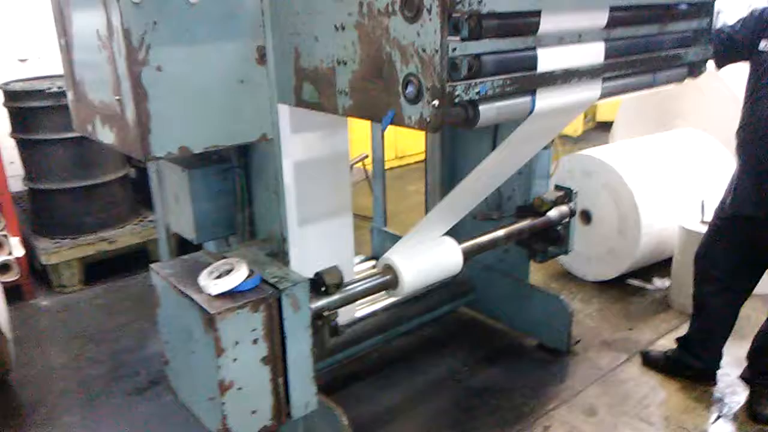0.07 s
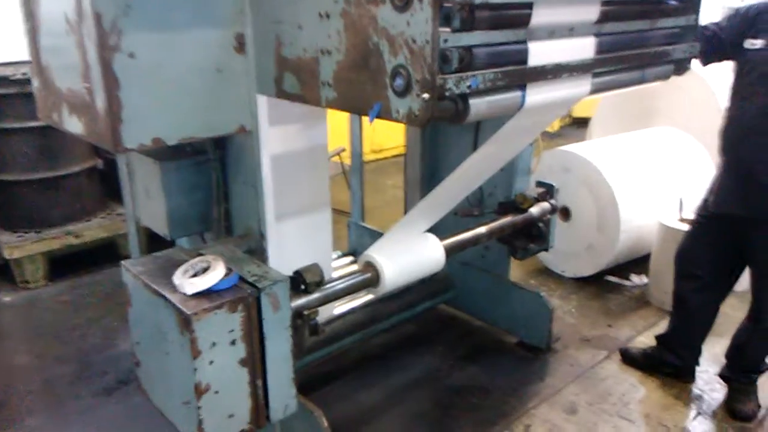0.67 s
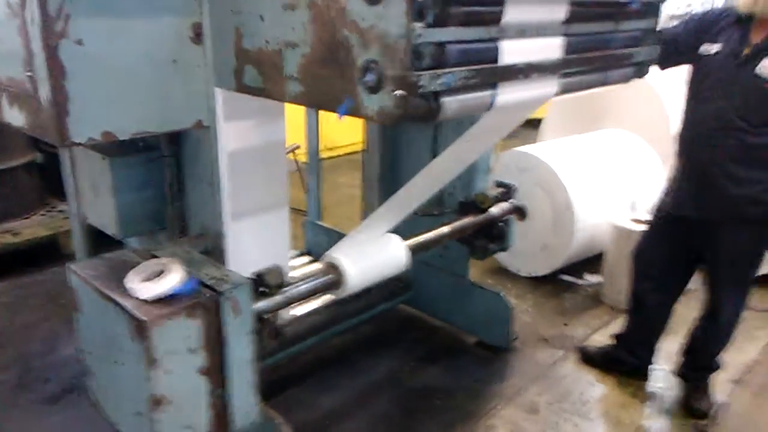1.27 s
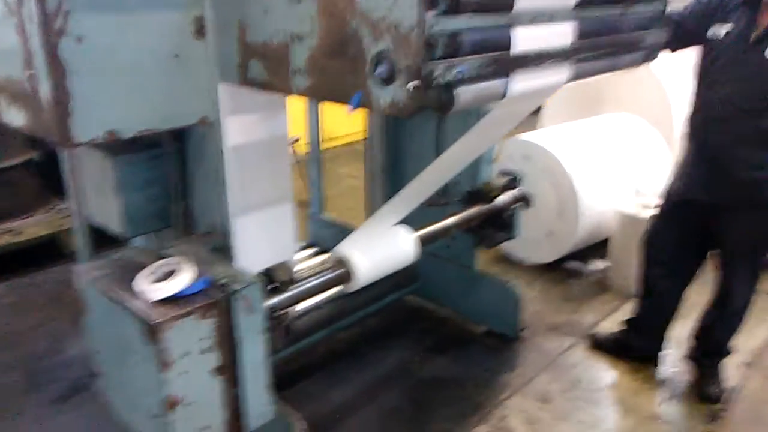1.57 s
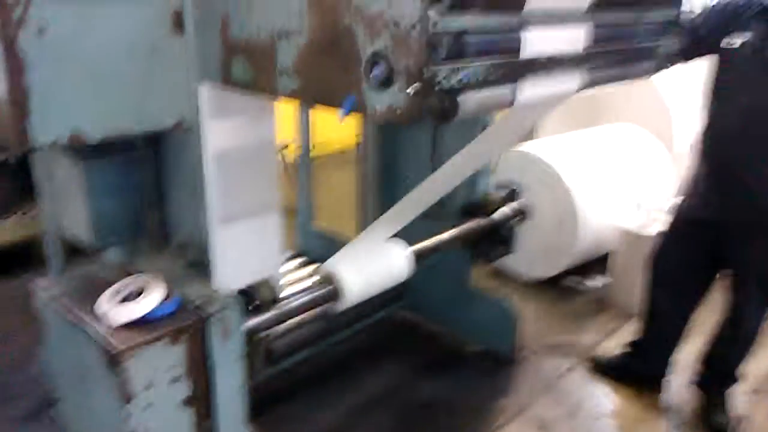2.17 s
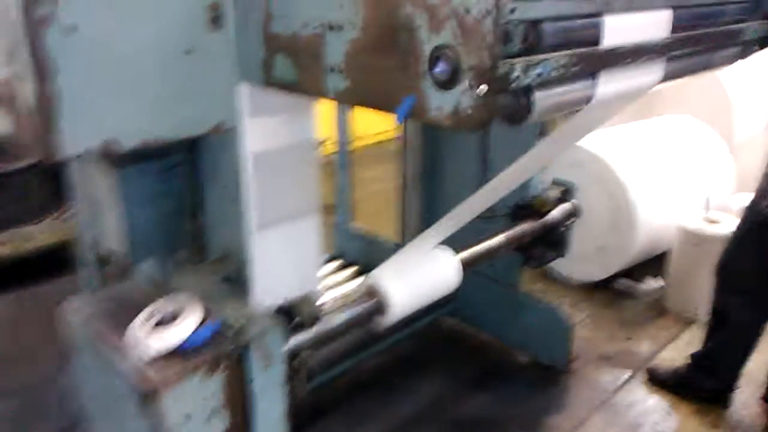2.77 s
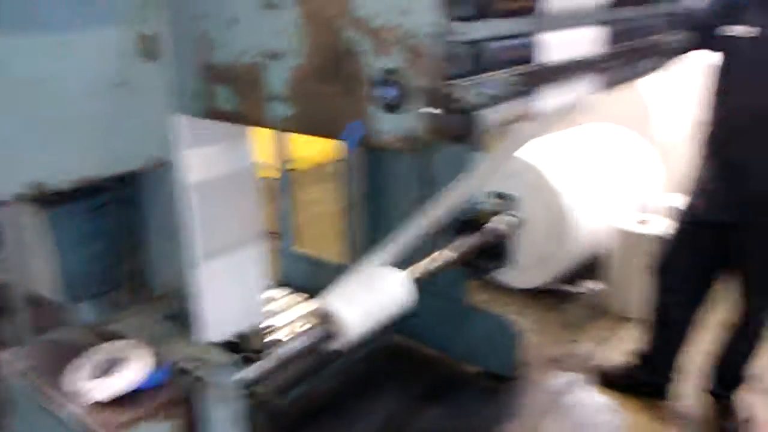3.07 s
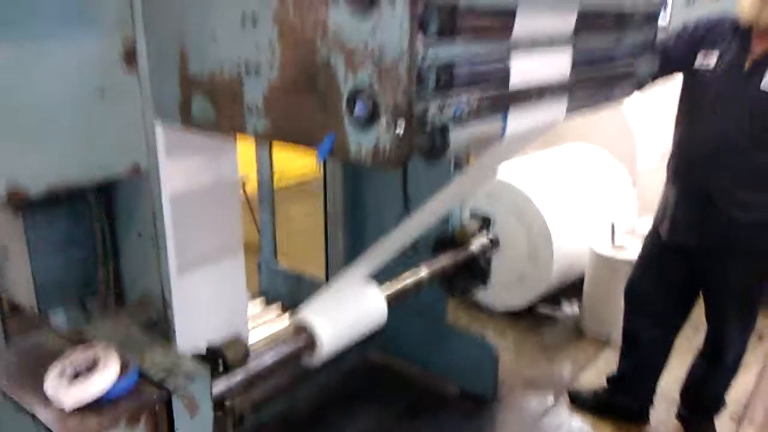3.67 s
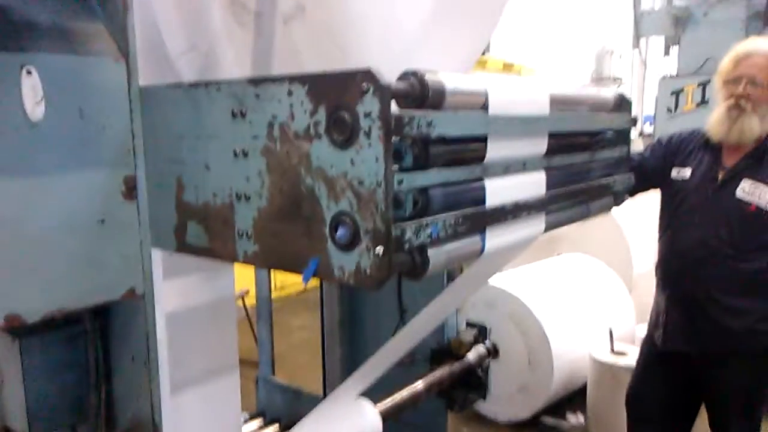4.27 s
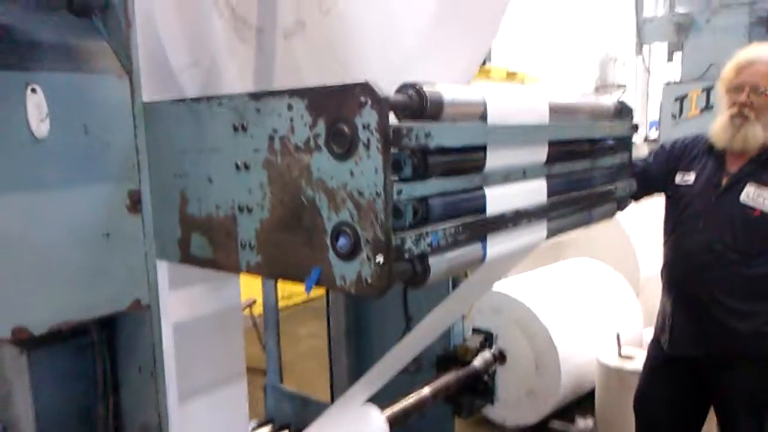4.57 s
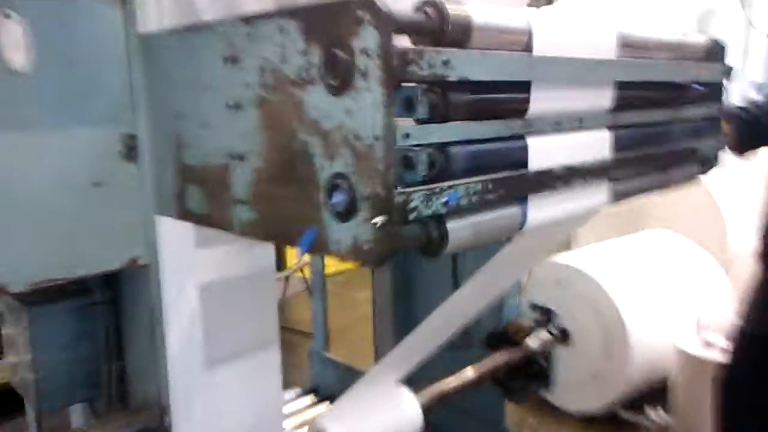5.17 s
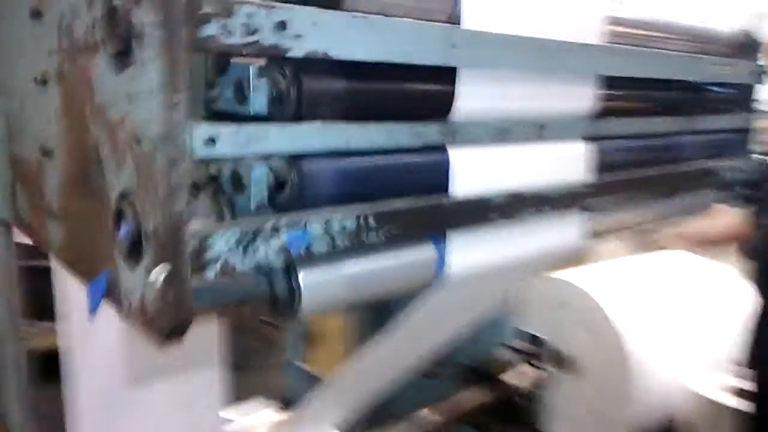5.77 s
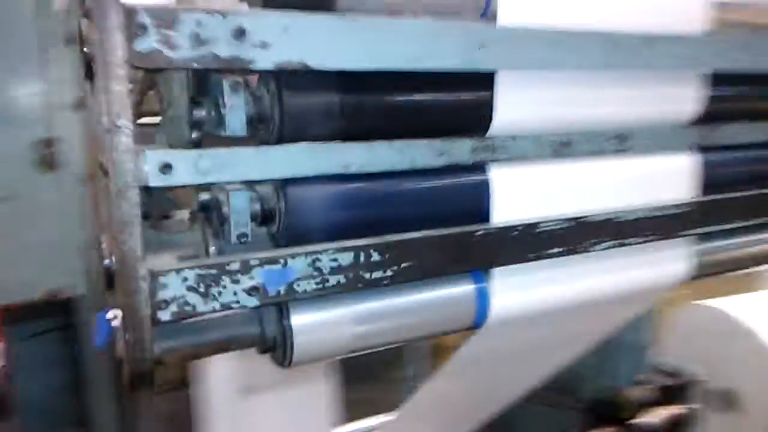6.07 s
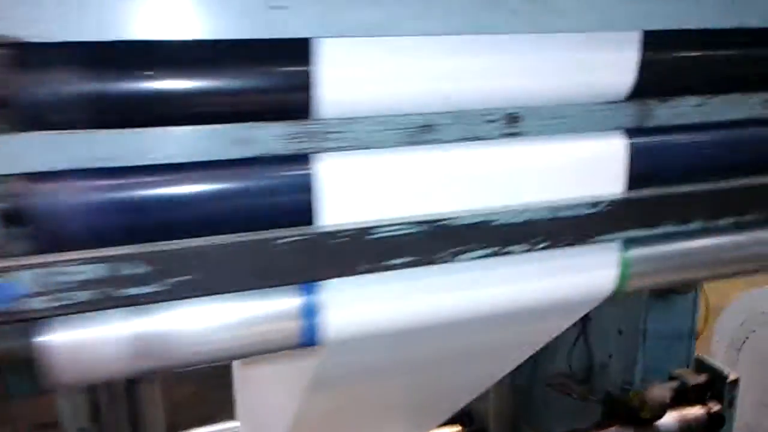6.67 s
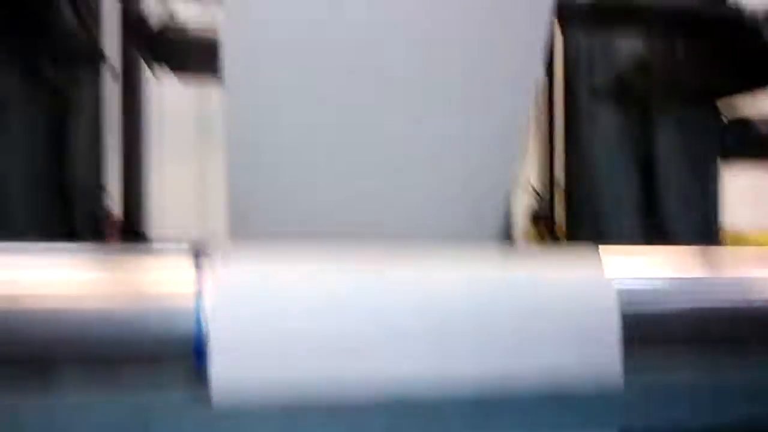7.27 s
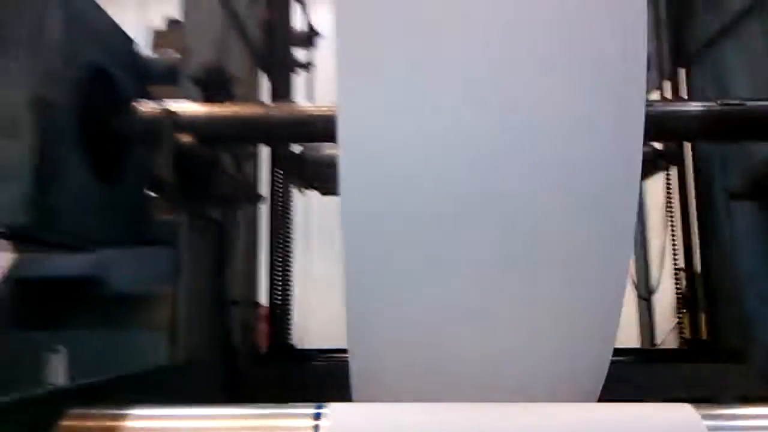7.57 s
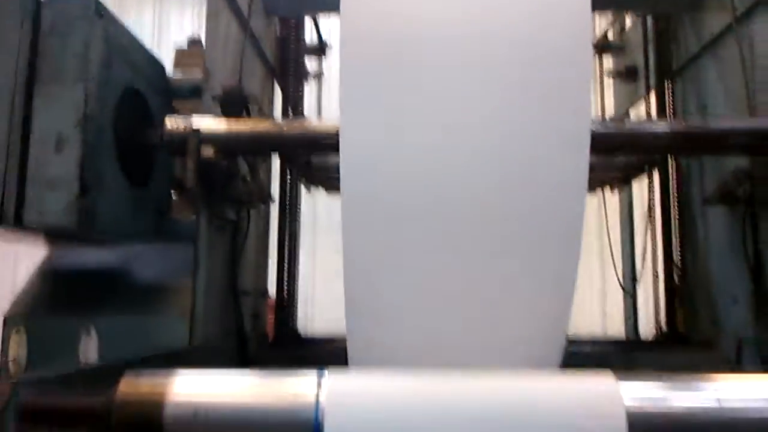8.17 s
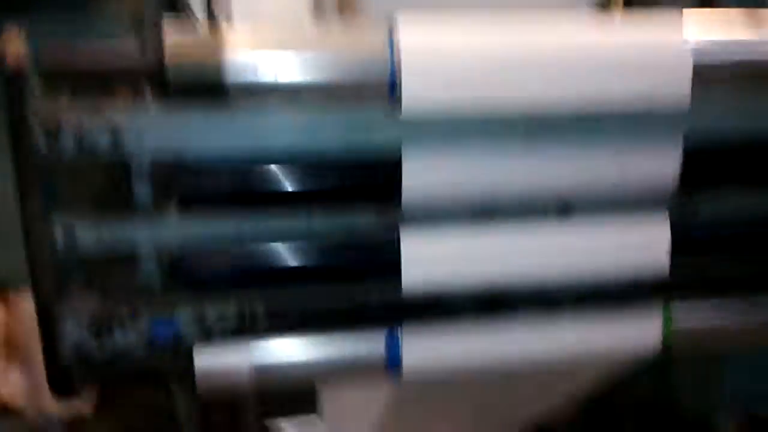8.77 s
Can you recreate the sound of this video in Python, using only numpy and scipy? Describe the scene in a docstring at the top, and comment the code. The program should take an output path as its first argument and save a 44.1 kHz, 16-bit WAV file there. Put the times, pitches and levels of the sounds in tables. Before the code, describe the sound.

A loud, thumping machine roar fades in: a printing press pulling paper through its rollers in a print shop. It falls back suddenly but keeps the same quick rhythm, over humming drives and a thin, high paper hiss. The microphone moves from the aisle toward the rollers, so the low rumble and thumps build again, with faint metallic squeaks and a gear whine near the end.

```python
"""A loud thumping roar fades in and drops at two seconds: a web printing press in a hard-walled shop.
It runs at steady speed; each cylinder turn repeats the same blows in the iron frame and the same gear
rumble. Drives hum, rollers and bearings roar, and the paper web sizzles as it peels off the rollers.
Rumble and roar grow again as the two-port mic is carried from the aisle up to the rollers."""
import sys
import numpy as np
from scipy import signal
from scipy.fft import rfft, irfft
from scipy.io import wavfile

SR = 44100
rng = np.random.default_rng(int(sys.argv[2]) if len(sys.argv) > 2 else 0)


def materialize(psi):
    """Save the field psi as 16-bit PCM at rate SR to the path in sys.argv[1].

    A 1-D psi becomes a single channel; in a 2-D psi each row is a channel.
    """
    bounded = np.clip(np.atleast_2d(psi).T, -1, 1)
    quanta = np.round(bounded * 32767).astype(np.int16)
    wavfile.write(sys.argv[1], SR, quanta)


N = 397782
TIME_S, FREQ_HZ = np.arange(N) / SR, np.arange(N // 2 + 1) * SR / N
TURN_HZ = 6.797

# low wash of the shop: freq_hz, density_db
WASH_SPECTRUM = [(30, -25), (42, -25), (56, -11), (75, -8), (95, -7), (120, -1.5), (160, -4.5), (200, -4.5),
                 (255, -2.5), (310, -2), (365, -4), (430, -6.5), (520, -21.5), (800, -29)]
# weak steady tones, relative to the rumble: pitch_hz, level_db
HUMS = [(55.6, -26.5), (333.2, -21), (365.8, -15.5), (693.5, -25.5), (1195, -27.5), (1577, -29)]
# where the motor hum stands out: time_s, level_db, falloff_db_per_s
MOTOR_SPOTS = [(1.45, -28.5, 7), (8.95, -22, 20)]
# where the gear whine stands out: time_s, level_db, falloff_db_per_s
WHINE_SPOTS = [(1.0, -31, 9.8), (4.2, -30, 14.6), (6.85, -31, 25), (8.0, -23, 14), (8.65, -23, 9)]
# where the whine's octave stands out: time_s, level_db, falloff_db_per_s
OCTAVE_SPOTS = [(1.7, -37, 4.7), (3.2, -35, 5.9), (8.65, -32, 22)]
# brief metallic rings: peak_s, pitch_hz, half_length_s, level_db
RINGS = [(4.146, 345, .03, -21), (5.028, 610, .012, -24), (5.052, 555, 0.019, -22.5), (5.1, 690, .018, -26),
         (5.24, 1170, 0.022, -31), (5.76, 1291, .02, -28), (6.727, 1580, .04, -28),
         (7.033, 2580, .028, -34), (7.647, 1205, 0.022, -27), (8.28, 1722, .02, -31),
         (8.38, 2957, .02, -33), (8.537, 1040, .018, -24), (8.73, 1185, 0.031, -26),
         (8.824, 2756, .018, -35), (8.89, 1590, .015, -30), (8.892, 2038, .018, -32)]
# paper peeling off the rollers: freq_hz, density_db
SIZZLE_SPECTRUM = [(4500, -46), (5700, -10.5), (6400, -2), (7100, -4), (7700, 0.5), (8100, -1), (8500, 0.5),
                   (9400, -1.5), (10100, -1.5), (11200, -4), (12500, -8.5), (13500, -11), (14300, -16)]
# narrow resonances, relative to the sizzle: centre_hz, width_hz, level_db
SIZZLE_RESONANCES = [(7612, 45, -20), (8405, 65, -18)]
# sizzle balance between the ports: freq_hz, left_minus_right_db
SIZZLE_BALANCE = [(5700, -1), (6500, 2.5), (7600, -1), (8400, -6), (10000, -12.5), (12500, -13),
                  (14000, -8)]
# shading of the sizzle by the roller stand: time_s, gain_db, leftward_db
SIZZLE_SHADING = [(2.2, -24, -6.5), (2.27, -24, -6.5), (4.98, -24, -6.5), (5.21, -29, -4.5),
                  (5.55, -29, -1), (6.02, -28, -3.5), (6.21, -32.5, -3.5), (7.09, -27.5, -6.5),
                  (7.44, -30.5, -2.5), (7.88, -31, -6), (8.22, -33.5, -6), (8.6, -29.5, -6),
                  (9.0, -30, -6.5)]
# taut web, drumming low and scraping high: freq_hz, density_db
RASP_SPECTRUM = [(340, -14), (430, 7.5), (540, 9.5), (660, -7), (1000, 7), (1400, -16), (2200, -5),
                 (2700, -2), (3300, -5), (3900, -16)]
# where the rasp stands out, relative to the roar: time_s, level_db, falloff_db_per_s
RASP_SPOTS = [(8.62, -1, 7)]
# roller roar: freq_hz, density_db
ROLLER_SPECTRUM = [(280, -33), (450, -6), (580, -0.5), (720, 0.5), (900, -3.5), (1080, -4), (1250, -2.5),
                   (1500, -5), (1800, -6.5), (2250, -11.5), (2800, -11), (3300, -16), (4000, -18.5),
                   (5500, -19.5)]
# bearing rush: freq_hz, density_db
BEARING_SPECTRUM = [(1800, 4), (2500, 0), (3400, 2), (4000, -1), (4600, -1.5), (5000, 1.5), (5500, -2.5),
                    (6400, -1), (8000, -10.5), (14000, -19)]
# echoes off nearby steel panels: delay_s, gain_db
PANEL_ECHOES = [(.0023, -12.5), (.0037, -12), (.0058, -17), (.0083, -15.5)]
# gear train rumble: freq_hz, density_db
GEAR_SPECTRUM = [(70, -18), (115, -1), (140, -1), (170, -4.5), (215, -1), (255, -1.5), (300, -2.5),
                 (360, -2), (470, -10.5), (700, -6.5), (1300, -22)]
# blows of one turn: phase_turns, pitch_hz, rise_ms, aisle_db, beside_db, front_db, rollers_db
BLOWS = [(.078, 169, 7.6, -18, -12, -13, -11), (.146, 248, 23.5, -19, -17, -21, -20),
         (.248, 189, 15.4, -19, -16, -19, -19), (.366, 326, 24, -26, -22, -27, -26),
         (.385, 386, 3, -15, -10, -13, -13), (.43, 139, 9.3, -22, -20, -21, -18),
         (.59, 120, 18.5, -20.5, -17.5, -15, -15), (.705, 218, 3.4, -12, -10, -15, -12),
         (.793, 243, 24, -24, -21, -18, -19.5), (.901, 148, 6.9, -18, -13, -10, -12),
         (.921, 157, 22.8, -20, -14, -16, -25), (.939, 184, 4.6, -19, -14, -9, -26)]
# mic path: time_s, place (0 aisle, 1 beside the stand, 2 in front of it, 3 at the rollers)
MIC_PATH = [(3.85, 0), (4.15, 1), (5.2, 1), (5.55, 2), (6.3, 2), (6.9, 3)]
# gains along the mic path: time_s, rumble_db, roar_db
APPROACH = [(2.4, -20, -25.5), (2.51, -20, -26), (3.59, -21, -25.5), (4.03, -18.5, -26),
            (4.13, -14.5, -22.5), (4.49, -16, -23), (5.58, -18, -23), (8.04, -17, -24),
            (8.67, -12.5, -22.5), (9.0, -12, -21.5)]


def undb(db):
    """Decibels to gain."""
    return 10 ** (np.asarray(db) / 20)


def ramp(from_s, to_s):
    """Linear rise from 0 to 1."""
    return np.clip((TIME_S - from_s) / (to_s - from_s), 0, 1)


def curves(table):
    """Table columns, interpolated over time."""
    times_s, *columns = np.transpose(table)
    return [np.interp(TIME_S, times_s, column) for column in columns]


def passing_db(spots, floor_db):
    """Level that peaks as the mic passes each spot."""
    peaks_db = [db - db_per_s * np.abs(TIME_S - at_s) for at_s, db, db_per_s in spots]
    return np.maximum(np.max(peaks_db, axis=0), floor_db)


def walk(rate_hz):
    """Smooth random drift, unit spread."""
    smooth = signal.resample_poly(rng.standard_normal(int(2 * rate_hz * TIME_S[-1]) + 3), 8, 1)
    return np.interp(16 * rate_hz * TIME_S, np.arange(len(smooth)), smooth)


def colour(x, spectrum):
    """Filter by a spectrum table; 20 dB per octave roll-off beyond its ends."""
    hz, db = np.transpose(spectrum)
    octave, knots = np.log2(FREQ_HZ + 1), np.log2(hz)
    outside = np.abs(octave - np.clip(octave, knots[0], knots[-1]))
    return irfft(rfft(x) * undb(np.interp(octave, knots, db) - 20 * outside), N)


def diffuse(pair, port_gap_m=0.18):
    """Reverberant field at two ports: bass alike, treble unrelated; mid rms 1."""
    coherence = np.sinc(2 * FREQ_HZ * port_gap_m / 343)
    side = irfft(rfft(pair[1]) * np.sqrt((1 - coherence) / (1 + coherence)), N)
    return np.array([pair[0] + side, pair[0] - side]) / pair[0].std()


def pan(leftward_db):
    """Constant-power left and right gains."""
    gains = undb(np.array([leftward_db, -leftward_db]).reshape(2, -1) / 2)
    return gains / np.sqrt(np.mean(gains ** 2, axis=0))


def grains(spread_db):
    """Dense tiny impacts of uneven size, two channels."""
    size = np.repeat(rng.standard_normal(N // 32 + 1), 32)[:N]
    return rng.standard_normal((2, N)) * undb(spread_db * size)


def stereo_sine(hz, wander_hz, skew):
    """Unit-rms sine; shop echoes skew its phase between the ports, more at high pitch."""
    phase = 2 * np.pi * np.cumsum(hz + wander_hz) / SR
    shift = min(hz / 900, 1.2) * skew
    return np.sqrt(2) * np.sin([phase + shift / 2, phase - shift / 2])


def tone(hz, wander_hz, flutter_db):
    """Tone wavering in pitch, stereo phase and level."""
    return stereo_sine(hz, wander_hz * walk(5), skew=walk(0.923)) * undb(flutter_db * walk(13))


def load_throb(depth_db, peak_turns):
    """Gain following the load, which rises three times a turn."""
    return undb(depth_db * np.cos(6 * np.pi * (TURN_HZ * TIME_S - peak_turns)))


def flicker(x, depth_db, rate_hz):
    """Half-octave bands swell independently as different machine parts ring."""
    spectrum, octave = rfft(x), np.log2(np.clip(FREQ_HZ, 500, 4000) / 500)
    bands = (irfft(spectrum * np.maximum(1 - np.abs(2 * octave - k), 0), N) for k in range(7))
    y = sum(band * undb(depth_db * walk(rate_hz)) for band in bands)
    return y * x.std() / y.std()


def panel_echoes(x, drift_s):
    """Panel echoes comb the sound into metallic resonances that slide as the mic moves."""
    y = x
    for delay_s, db in PANEL_ECHOES:
        source_s = TIME_S - delay_s - drift_s * walk(1.2)
        y = y + undb(db) * np.array([np.interp(source_s, TIME_S, channel) for channel in x])
    return y * x.std() / y.std()


def shop_wash():
    """Low reverberant noise of the shop."""
    return diffuse(colour(rng.standard_normal((2, N)), WASH_SPECTRUM))


def hums():
    """Weak steady tones of the press."""
    return sum(undb(db) * tone(hz, wander_hz=1.6, flutter_db=1.5) for hz, db in HUMS)


def drive(loud, motor_hz=252.3, whine_hz=394.1):
    """Motor hum, plus a gear pair's load-pulsed whine and its octave."""
    motor = tone(motor_hz, wander_hz=0.913, flutter_db=3)
    motor *= undb(passing_db(MOTOR_SPOTS, floor_db=-38) + 11.5 * loud)
    whine = tone(whine_hz, wander_hz=0.42, flutter_db=2.2)
    whine *= undb(passing_db(WHINE_SPOTS, floor_db=-42) + 1.5 * loud)
    octave = tone(2 * whine_hz, wander_hz=1.3, flutter_db=2)
    octave *= undb(passing_db(OCTAVE_SPOTS, floor_db=-48) + 11 * loud)
    return motor + whine * load_throb(depth_db=2, peak_turns=0.1) + octave


def metal_rings(wander_hz=11, rough_db=2):
    """Single resonances squeak out of the roar, rough and unsteady, and sink back."""
    out = 0
    for peak_s, hz, half_length_s, db in RINGS:
        ring = stereo_sine(hz, wander_hz * walk(45), skew=rng.standard_normal())
        swell = np.exp(-((TIME_S - peak_s) / half_length_s) ** 2)
        out = out + ring * swell * undb(db + rough_db * walk(90))
    return out


def paper_web(trim_db=1, neutral_side_db=-7):
    """Peeling paper sizzles with two narrow resonances; its top reaches mostly the right port."""
    sizzle = diffuse(colour(grains(spread_db=1), SIZZLE_SPECTRUM)) * undb(0.65 * walk(7.2) + trim_db)
    for hz, width_hz, db in SIZZLE_RESONANCES:
        whistle = irfft(rfft(rng.standard_normal((2, N))) / (1 + 2j * (FREQ_HZ - hz) / width_hz), N)
        sizzle += undb(db) * whistle / whistle.mean(axis=0).std()
    balance_db = np.interp(FREQ_HZ, *np.transpose(SIZZLE_BALANCE))
    sizzle = irfft(rfft(sizzle) * pan(balance_db), N)
    gain_db, side_db = curves(SIZZLE_SHADING)
    return sizzle * undb(gain_db) * pan(side_db - neutral_side_db)


def bearing_rush():
    """Bearing rattle, dense enough to merge into a bright rush."""
    return diffuse(colour(grains(spread_db=1.5), BEARING_SPECTRUM)) * undb(0.5 * walk(20))


def roller_roar(right_lag_samples=12):
    """Roller rattle merges into a restless roar; close up, the taut web rasps over it."""
    room = diffuse(colour(grains(spread_db=2), ROLLER_SPECTRUM))
    near = colour(grains(spread_db=2.5)[0], ROLLER_SPECTRUM)
    direct = np.array([near, np.roll(near, right_lag_samples)]) / near.std()
    rasp = diffuse(colour(grains(spread_db=4.5), RASP_SPECTRUM))
    rasp *= undb(passing_db(RASP_SPOTS, floor_db=-20.5))
    return flicker(room + undb(-4.5) * direct * pan(1.2) + rasp, depth_db=1.5, rate_hz=14)


def gear_rumble(drift_hz=0.299):
    """The same tooth errors recur each turn; their blend drifts as the mic moves."""
    turn_sample = (TIME_S * TURN_HZ % 1 * SR / TURN_HZ).astype(int)
    paths = [(rng.standard_normal((2, SR))[:, turn_sample], walk(drift_hz)) for _ in range(4)]
    blend = sum(teeth * weight for teeth, weight in paths)
    blend /= np.sqrt(sum(weight ** 2 for _, weight in paths))
    return diffuse(colour(blend, GEAR_SPECTRUM))


def cylinder_blows(scatter_db=0.73, jitter_s=0.00013):
    """Cylinder gaps strike at set points of each turn; each blow booms in its own part of the frame."""
    age_s, out = TIME_S[:SR // 6], np.zeros(N)
    turns = np.arange(-1, int(TIME_S[-1] * TURN_HZ) + 1)
    place, = curves(MIC_PATH)
    for phase_turns, hz, rise_ms, *place_db in BLOWS:
        timing, strength = rng.standard_normal((len(turns), 2)).T
        onsets = (((turns + phase_turns) / TURN_HZ + jitter_s * timing) * SR).astype(int)
        inside = (onsets >= 0) & (onsets < N)
        hits = np.bincount(onsets[inside], undb(scatter_db * strength[inside]), N)
        rises = age_s * 1000 / rise_ms
        boom = rises ** 2 * np.exp(2 - 2 * rises) * np.sin(2 * np.pi * hz * age_s)
        level_db = np.interp(place, range(len(place_db)), place_db)
        out += signal.fftconvolve(hits, boom)[:N] * undb(level_db)
    return out


def scene():
    """Sound fades in loud; roar and thumps drop at 2 s as the sizzle holds, then grow as the mic nears."""
    fade_in = ramp(0.62, 0.92) ** 0.73
    loud = 1 - ramp(2.047, 2.237)  # scales each part's opening boost in dB
    lean_in = ramp(8.2, 8.95)
    rumble_db, roar_db = curves(APPROACH)
    blows = cylinder_blows() * undb(8 * loud + 3 * lean_in)
    rumble = undb(-10) * gear_rumble() + undb(-9) * shop_wash()
    rumble *= load_throb(depth_db=0.9, peak_turns=0.04934)
    rumble = (rumble + hums()) * undb(rumble_db + 10.5 * loud)
    tones = drive(loud)
    rollers = roller_roar() * undb(-0.5 + 10 * loud) * pan(0.94)
    bearings = bearing_rush() * undb(-9 + 16 * loud) * pan(-0.35)
    roar = panel_echoes((rollers + bearings) * undb(roar_db), drift_s=0.0005)
    return fade_in * (blows + rumble + tones + roar + metal_rings() + paper_web())


def record(dry, cutoff_hz=14250):
    """The mic rounds the highest peaks and cuts the top."""
    rounded = dry / (1 + dry ** 8) ** (1 / 8)
    return signal.sosfilt(signal.ellip(12, 0.1, 80, cutoff_hz, fs=SR, output="sos"), rounded)


dry = scene()
out = record(dry)
materialize(out)
```